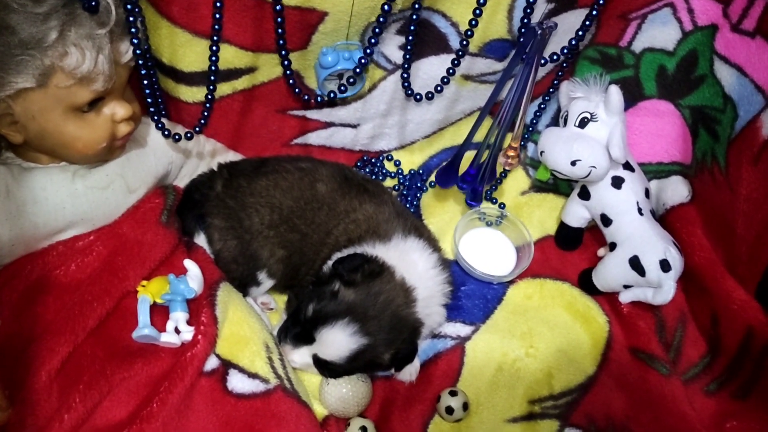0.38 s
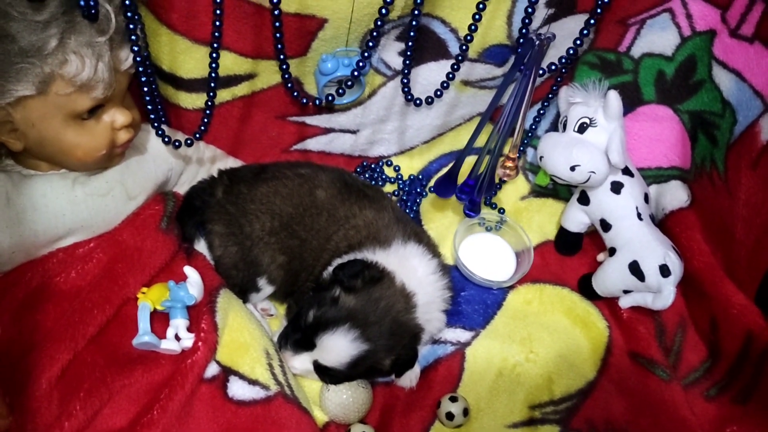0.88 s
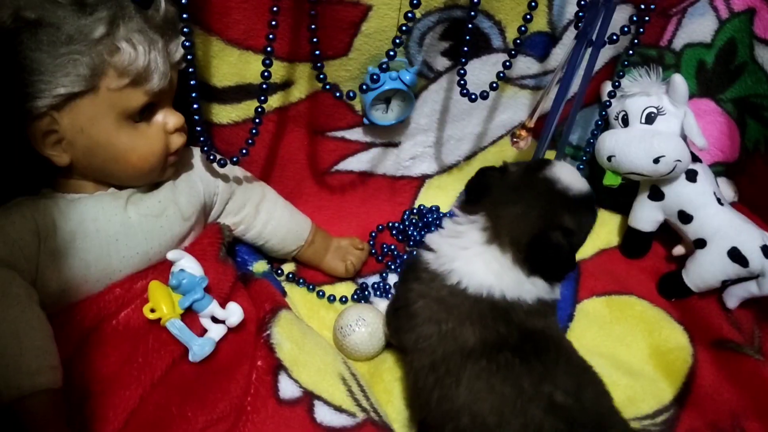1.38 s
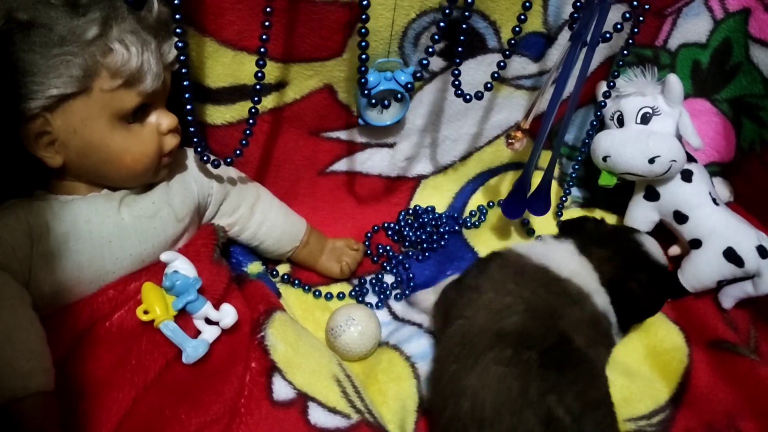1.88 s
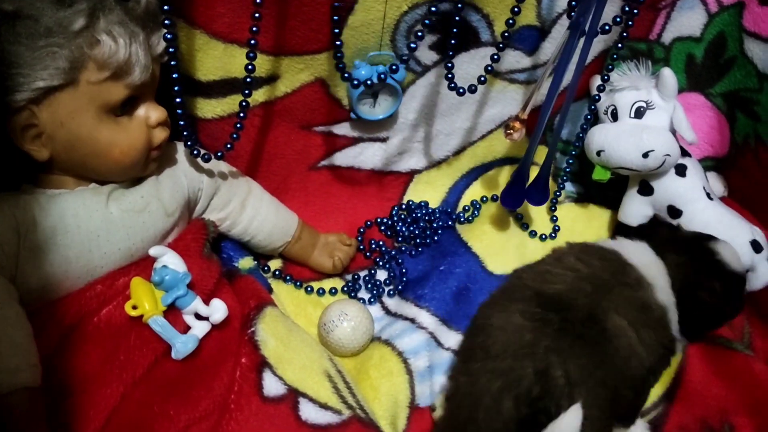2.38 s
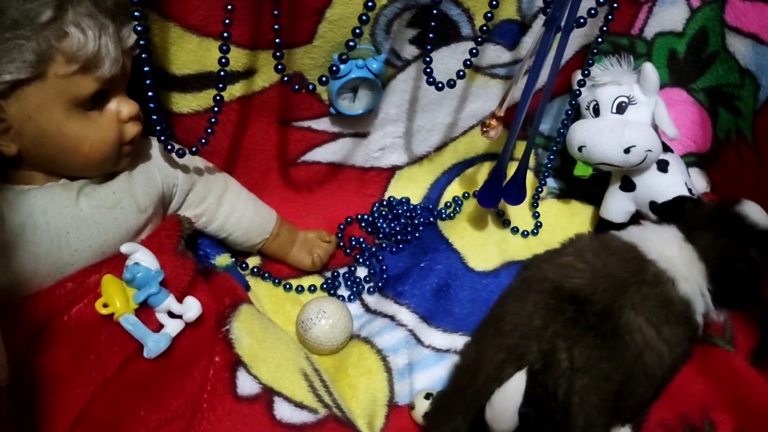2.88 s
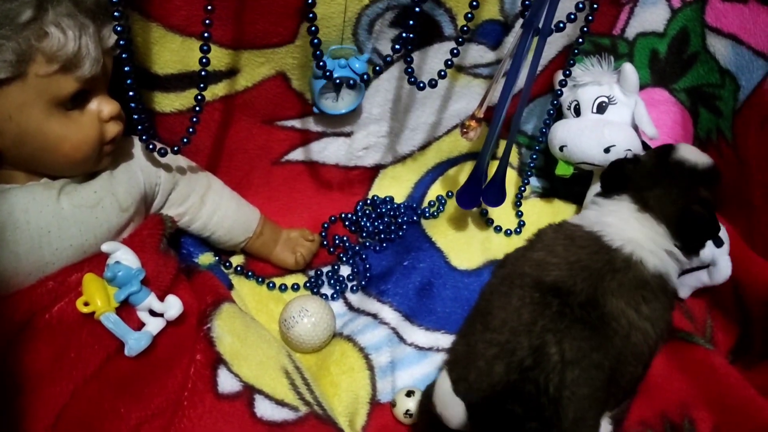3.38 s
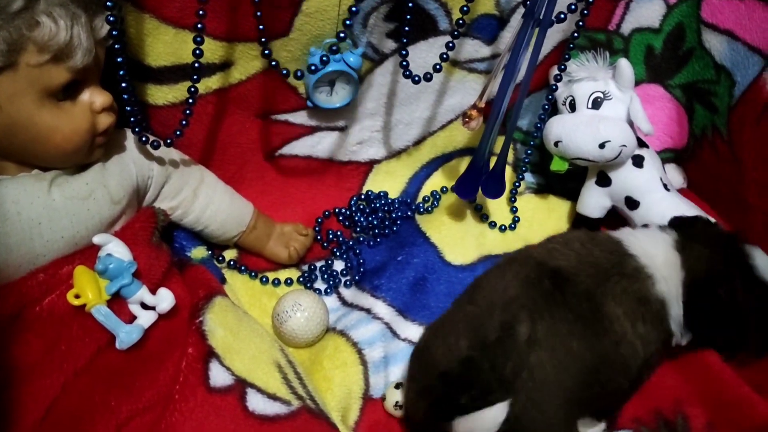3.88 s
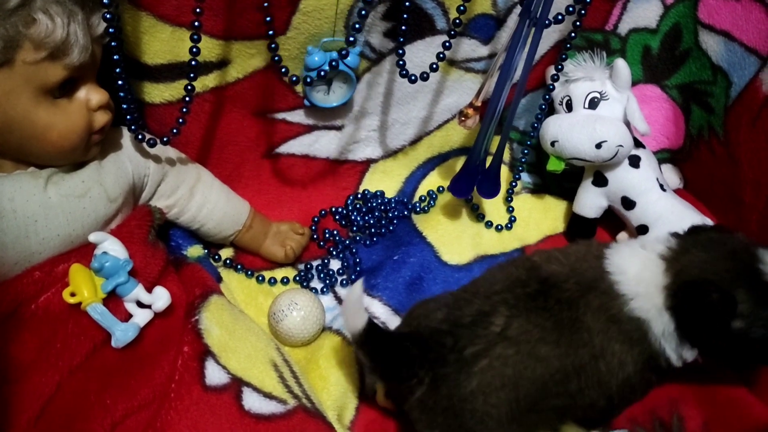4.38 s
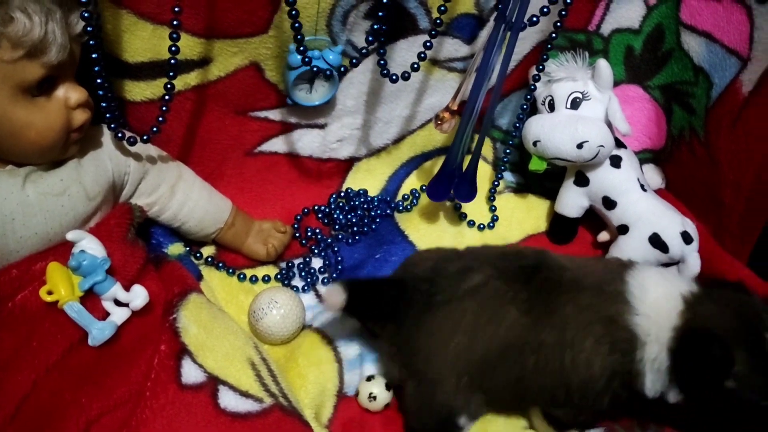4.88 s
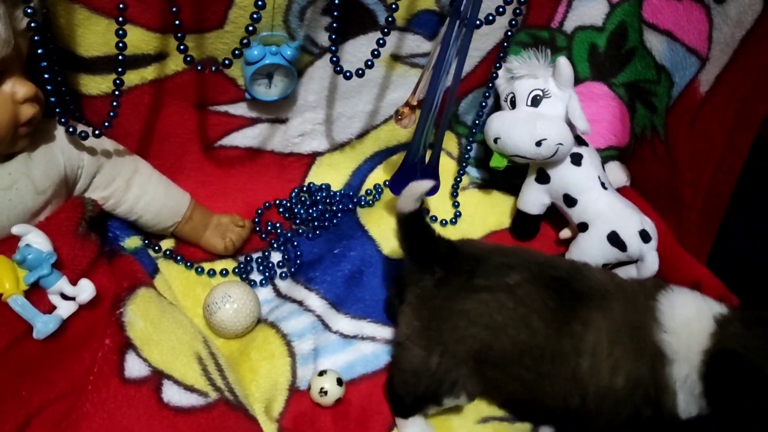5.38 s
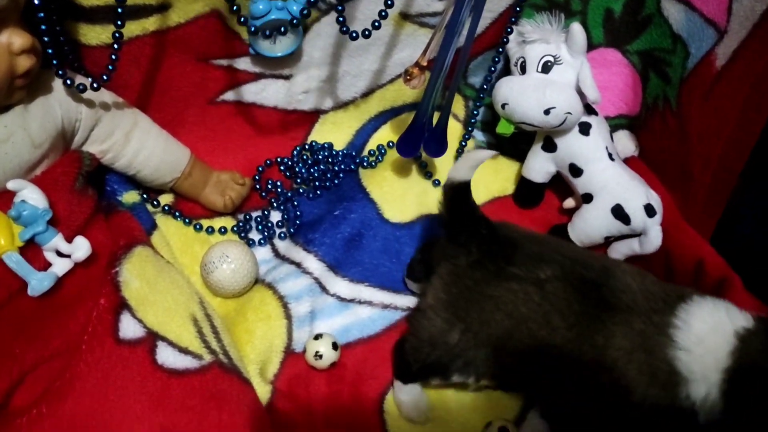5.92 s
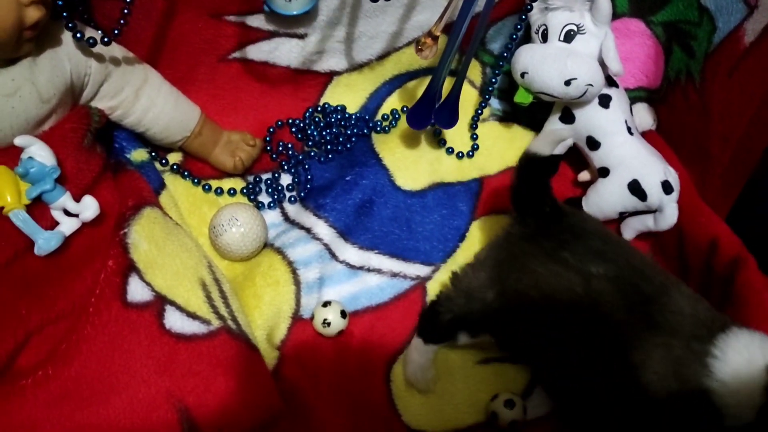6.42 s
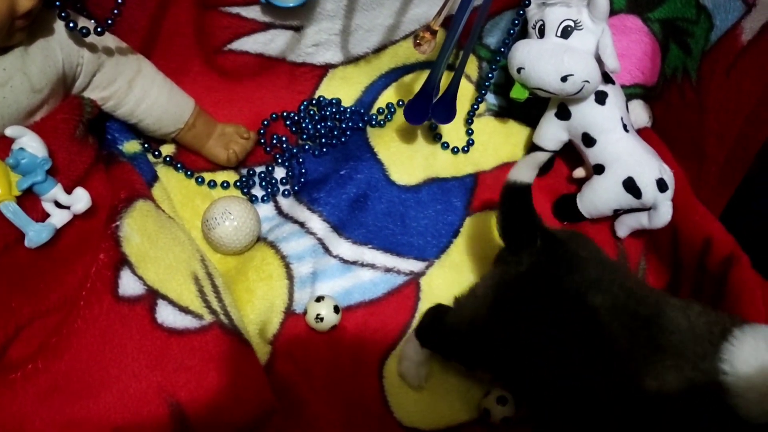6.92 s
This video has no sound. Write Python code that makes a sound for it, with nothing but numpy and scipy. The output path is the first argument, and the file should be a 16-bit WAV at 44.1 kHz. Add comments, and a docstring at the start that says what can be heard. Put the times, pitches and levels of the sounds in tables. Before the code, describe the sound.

A small, furnished room, picked up close in stereo with a constant soft, low-weighted hiss. About one second of near silence, a dull tap at 1.1 and a very brief level dip near 1.2. From 1.36 to 2.3 a puppy gives four short whimpers, thin near-pure whistles arching around 1 to 1.3 kHz and sagging, the third strongest, the last a small chirp. A pause follows, with a soft knock at 2.5. From 3.45 the whines return in quick succession, running into a hoarse, rough yelp at 3.9-4.06. More lower whines follow at 4.2 and 4.5, a short groan at 4.6, then a longer low groan from 4.8 to 5.2, throbbing rapidly with rasp over cloth scuffs. Light handling taps dot this run. At 5.7 a sputtering nasal huff fades by 6. Then hiss, a faint blanket scuff at 6.4 and a fainter one at 6.9.

```python
"""A puppy on a blanket whimpers in short arched cries: near-pure whistles, roughened by shaken pitch and air.
It yelps once hoarsely (chaotic slaps into resonances), groans twice with a throb (a fluttering hum with rasp)
and huffs through its nose (sputtering noise around a faint voiced hum). Cloth scuffs are shaped noise,
handling taps and knocks short low pushes. A small furnished room answers, two spaced microphones hiss,
and the level dips briefly near the start."""
import sys
import numpy as np
from scipy import signal
from scipy.fft import rfft, irfft, next_fast_len
from scipy.io import wavfile

SR = 44100
rng = np.random.default_rng(int(sys.argv[2]) if len(sys.argv) > 2 else 0)


def invert_db(level):
    """Linear amplitude ratio for a level in decibels (20 dB per decade), elementwise."""
    return 10 ** (np.asarray(level, dtype=float) / 20)


def generate_wav(signal):
    """Clip the signal to [-1, 1] and save it as 16-bit WAV at the path in sys.argv[1]."""
    frames = np.transpose(np.atleast_2d(signal))
    scaled = np.clip(frames, -1, 1) * 32767
    pcm = np.round(scaled).astype(np.int16)
    wavfile.write(sys.argv[1], SR, pcm)


N = 310023  # length in samples, about 7 s

# nasal colour of upper harmonics and breath, before tilting: frequency_hz, relative_level_db
NOSE = [(2400, -2.5), (2900, -18.5), (3600, -13.5), (4200, -4.5), (5000, -2), (6300, -3), (7300, -11.5),
        (8600, -4), (10000, -14), (11200, -24), (13000, -11.5), (15500, -19)]


def evened(x):
    """Scales to rms 1."""
    return x / np.sqrt(np.mean(x ** 2) + 1e-20)


def read(points, hz):
    """Reads a table over frequency, interpolating on a log axis."""
    f, value = np.transpose(points)
    return np.interp(np.log(hz + 1), np.log(f + 1), value)


def columns(rows):
    """Turns breakpoints into a time axis and every other column at sample rate."""
    s, *cols = np.transpose(rows)
    t = np.arange(s[0], s[-1], 1 / SR)
    return t, [np.interp(t, s, c) for c in cols]


def turned(colour, tilt_db):
    """Tilts a colour by so many dB per octave above 5500 Hz, the strongest nasal resonance."""
    return [(hz, db + tilt_db * max(np.log2(hz / 5500), 0)) for hz, db in colour]


def add(mix, start_s, sound, pan_db=0., edge_s=0.002):
    """Lays a sound into both channels, fading in over edge_s and out over twice that; positive pan is left."""
    n = np.arange(len(sound))
    soft = np.minimum(1, np.minimum(n, n[::-1] / 2) / (edge_s * SR + 1))
    sides = invert_db(pan_db * np.array([[0.5], [-0.5]]))
    part = mix[:, round(start_s * SR):][:, :len(n)]
    part += (sound * soft * sides)[:, :part.shape[1]]


def noise(points, size, channels=1):
    """Noise of a given spectrum, rms 1."""
    n = next_fast_len(size)
    white = rfft(rng.standard_normal((channels, n)))
    colour = invert_db(read(points, np.fft.rfftfreq(n, 1 / SR)))
    return evened(irfft(white * colour, n)[:, :size])


def wobble(size, hz):
    """Smooth random motion of rms 1, up to about hz."""
    lowpass = signal.butter(2, hz, fs=SR, output="sos")
    return evened(signal.sosfilt(lowpass, rng.standard_normal(size + 2000))[2000:])


def resonate(x, modes):
    """Sums resonances, each passed twice for dark valleys, at rms 1."""
    out = 0
    for hz, width, db in modes:
        pole = np.exp((2j * np.pi * hz - np.pi * width) / SR)
        once = signal.lfilter([1 - abs(pole)], [1, -pole], x)
        twice = signal.lfilter([1 - abs(pole)], [1, -pole], once)
        out = out + invert_db(db) * twice.real
    return evened(out)


def stack(turns, hz, colour, first):
    """Sixteen harmonics from number first upward under a fixed colour, at steady loudness."""
    k = np.arange(first, first + 16)[:, None]
    height = invert_db(read(colour, k * hz)) * (k * hz < SR / 2.5)
    lines = height * np.cos(2 * np.pi * k * turns + k ** 2)
    return lines.sum(0) * np.sqrt(2 / (height ** 2).sum(0))


def cry(mix, rows, pan_db, rough, tilt_db, second_db, upper_db):
    """A near-pure whistle of tight folds; roughness shakes pitch and strength and lets air through."""
    t, (db, hz) = columns(rows)
    u = (t - t[0]) / (t[-1] - t[0])
    # overtones swell in the middle of a cry and sink at its ends
    start, end = np.maximum(1 - 2 * u, 0) ** 2.5, np.maximum(2 * u - 1, 0) ** 2.5
    second_db = second_db + 0.44 * (db - db.max()) - start - 5.5 * end
    # a high second harmonic slides into the nasal valley, 52 dB per octave above 2180 Hz
    second_db = second_db - 52 * np.maximum(np.log2(2 * hz / 2180), 0)
    upper_db = upper_db - 13 * start - 10.5 * end
    rough = np.clip(rough + 0.25 * u ** 5, 0, 1)  # hoarser as the cry runs out
    nose = turned(NOSE, tilt_db)

    shaken_hz = hz * (1 + 0.12 * rough * wobble(len(t), 110) + 0.0071 * wobble(len(t), 40))
    turns = np.cumsum(shaken_hz) / SR
    fundamental = invert_db(db) * np.cos(2 * np.pi * turns)
    second = invert_db(second_db) * np.cos(4 * np.pi * turns)
    # in the high treble the harmonics give way to air
    lines = stack(turns, hz, turned(nose, -8.5), first=3) * (1 + 0.3 * wobble(len(t), 62))
    air = (0.25 + rough) * noise(turned(nose, 6.5), size=len(t))[0]
    sound = np.sqrt(2) * (fundamental + second) + invert_db(upper_db) * (lines + air)
    add(mix, t[0], sound * (1 + 0.83 * rough * wobble(len(t), 120)), pan_db)


def yelp(mix):
    """Folds slap chaotically into the throat; the mouth opens at the peak."""
    # resonances of the throat, then of the mouth: frequency_hz, width_hz, relative_level_db
    throat_modes = [(285, 30, -7.5), (740, 93, 2), (960, 74, 0)]
    mouth_modes = [(1423, 310, 4), (2140, 410, -5), (2780, 540, -10.5), (3890, 67, -10)]
    start_s, snap_s, end_s = 3.908, 4.024, 4.062  # the mouth is widest at the snap
    slap_hz = 306.6  # mean rate of the folds
    shut_db, open_db, opening_s, closing_s = -37.5, -18, 0.04, 0.011
    breath_db, gasp_db, gasp_lead_s, gasp_s = -50.5, -36.5, 0.019, 0.015  # breath bursts just before the snap
    t = np.arange(start_s, end_s, 1 / SR)
    late = t - snap_s

    fall_db = -600 * np.maximum(late, 0)  # held until the snap, then 600 dB per second down
    throat = invert_db(-26 + fall_db) * np.clip(0.4 + (t - t[0]) / 0.01, 0, 1)
    opening = np.exp(-(late / np.where(late < 0, opening_s, closing_s)) ** 4)
    mouth = throat / throat.max() * invert_db(shut_db) + invert_db(open_db) * opening ** 2
    breath = invert_db(breath_db) + invert_db(gasp_db) * np.exp(-((late + gasp_lead_s) / gasp_s) ** 2)

    turns = np.cumsum(slap_hz * (1 + 0.3 * wobble(len(t), 200))) / SR
    slaps = np.diff(np.floor(turns), prepend=0) * (1 + 0.33 * wobble(len(t), 300))
    slaps = slaps * (1 + 0.5 * (-1) ** np.floor(turns))  # strong-weak pairs
    puffs = np.exp(-(turns % 1) / 0.77) * rng.standard_normal(len(t))  # noise fading after each slap
    drive = evened(slaps - slaps.mean()) + 0.65 * evened(puffs)
    voice = throat * resonate(drive, throat_modes) + mouth * resonate(drive, mouth_modes)
    small_head = signal.butter(2, [230, 4300], "band", fs=SR, output="sos")  # sends out little bass
    voice = signal.sosfilt(small_head, voice)
    add(mix, t[0], voice + breath * noise(turned(NOSE, -7), size=len(t))[0], -2.6)


def hum(mix, rows, over_db, onset_db, onset_s, depth_start, depth_end):
    """Slack folds hum low; a flutter lets the tone through in bursts, and the overtones rasp between them."""
    # colour of the overtones: frequency_hz, relative_level_db
    chest = [(70, -30), (220, -2), (400, -10), (640, 8), (1000, -24), (1400, -11.5), (2300, -45),
             (5500, -38), (9000, -68)]
    throb_hz, crest_s = 26.07, 5.044  # rate of the flutter and one of its crests
    t, (db, hz) = columns(rows)
    over_db = over_db + onset_db * np.exp(-(t - t[0]) / onset_s)
    depth = np.clip(np.linspace(depth_start, depth_end, len(t)), 0, 1)
    beat = 2 * np.pi * (t - crest_s) * throb_hz
    shut = depth * (1 - np.cos(beat - 0.73 * np.cos(beat))) / 2  # slow swell, quick stop

    turns = np.cumsum(hz * (1 + 0.07 * depth * wobble(len(t), 110))) / SR
    tone = 2.12 * (1 - shut) * np.cos(2 * np.pi * turns) * (1 + 0.2 * wobble(len(t), 130))
    rasp = evened((1 + np.cos(2 * np.pi * turns)) * noise(chest, size=len(t))[0])
    over = (1 - 0.1 * depth) * stack(turns, hz, chest, first=2) + 0.62 * depth * rasp
    over = over * (0.66 + 0.48 * shut) * (1 + 0.31 * wobble(len(t), 120))
    air = invert_db(-24.5) * noise(turned(NOSE, 1), size=len(t))[0]  # through the nose
    add(mix, t[0], invert_db(db) * (tone + invert_db(over_db) * (over + air)), -2.5)


def huff(mix):
    """Air sputters through the nostrils; the harder the blast, the brighter."""
    # course of the blast before sputtering: time_s, level_db
    blast = [(5.5, -70), (5.55, -61.5), (5.7, -59), (5.712, -43.5), (5.73, -39), (5.77, -50), (5.82, -56.5),
             (5.9, -64.5), (5.98, -71)]
    # colour of air through the nostrils: frequency_hz, relative_level_db
    nostrils = [(410, -2.5), (700, -6), (3360, -2.5), (4700, -6), (8990, -8), (10600, -30), (12100, -14.5),
                (15500, -54.5)]
    t, (db,) = columns(blast)
    bright = np.clip(invert_db(0.42 * (db - db.max())), 0, 1)
    dull_air = noise(turned(nostrils, -33), size=len(t))[0]
    air = bright * noise(nostrils, size=len(t))[0] + (1 - bright) * dull_air
    add(mix, t[0], invert_db(db + 5.6 * wobble(len(t), 490)) * air)


def scuff(mix, peak_s, fading_s, rumble_db, rub_db, hiss_db):
    """Lumpy rumble of a body shifting, with the rub and fine hiss of cloth."""
    t = np.arange(-0.15, 0.5, 1 / SR)
    rise_s = 0.029
    shape_db = -7 * abs(t / np.where(t < 0, rise_s, fading_s)) ** 1.15  # 7 dB down after fading_s
    rumble = noise([(40, -8), (120, -0.5), (220, -7.5), (500, -11), (1500, -21.5), (3000, -70)], size=len(t))[0]
    rub = noise([(900, -19.5), (2000, 5), (4000, -1), (7000, -34.5)], size=len(t))[0]
    hiss = noise([(4500, -9.5), (8500, 8), (10800, -16.5), (12500, -3), (15500, -20.5)], size=len(t))[0]
    # the rub dies faster than the rumble, the hiss slower
    cloth = invert_db(rub_db + 1.4 * shape_db) * rub + invert_db(hiss_db + 0.73 * shape_db) * hiss
    cloth = cloth * invert_db(4.2 * wobble(len(t), 34))
    lumpy = invert_db(rumble_db + shape_db + 1.9 * wobble(len(t), 75)) * rumble
    add(mix, peak_s + t[0], lumpy + cloth, edge_s=0.012)


def thuds():
    """Short low pushes with a faint click, carried through the housing, some mostly to one microphone."""
    # handling taps and knocks: time_s, push_peak_db, ring_hz, length_cycles, left_right_db
    taps = [(1.08, -42, 356, 0.43, 2), (2.4626, -39.5, 254, 1.47, -0.5), (3.506, -43.5, 398, .6, 1),
            (3.7159, -36, 433, 0.16, -19), (3.767, -44.5, 480, 0.44, -22.5), (4.561, -36, 287, 1.23, -2.5),
            (5.4468, -34.5, 227, 0.2, -13.5), (5.565, -42.5, 198, 0.47, -14.5)]
    mix, t = np.zeros((2, N)), np.arange(-0.02, 0.02, 1 / SR)
    for s, db, hz, cycles, pan_db in taps:
        push = np.cos(2 * np.pi * hz * t) * np.exp(-(t * hz / cycles) ** 2)
        click = noise([(300, 4), (1000, -10), (4000, -24), (14000, -25)], size=len(t))[0]
        click = click * np.exp(-((t + 0.00033) / 0.0021) ** 2)
        click_db = -6.5 - 6 * cycles  # softer, longer thuds click less
        add(mix, s + t[0], invert_db(db) * (push + invert_db(click_db) * click), pan_db)
    return mix


def room(x):
    """Sparse taps of random sign, each band dying at its own speed; the bass reaches both microphones alike."""
    # reverberation: frequency_hz, t60_s
    t60 = [(250, 0.45), (1000, .28), (3000, 0.18), (10000, 0.21)]
    # colour of the room sound: frequency_hz, level_db
    wet = [(200, -10), (500, -8), (1200, -8), (2500, -1.5), (4500, -5), (12000, -0.5)]
    # likeness at both microphones, held within 0-1: frequency_hz, likeness
    alike = [(150, 1), (400, 0.3), (900, 0), (2000, 0.4)]
    size = SR // 2
    taps = np.zeros((2, size))
    at = np.arange(120, size - 20, 20) + rng.integers(0, 20, (2, (size - 121) // 20))
    np.put_along_axis(taps, at, rng.choice([-1., 1.], at.shape), 1)
    hz, t, z = signal.stft(taps, SR, nperseg=256)
    same = np.clip(read(alike, hz), 0, 1)[:, None]
    z = np.array([z[0], same * z[0] + np.sqrt(1 - same ** 2) * z[1]])
    decay = invert_db(-60 * t / read(t60, hz)[:, None])
    even = np.sqrt(len(t) / (decay ** 2).sum(1, keepdims=True))  # same energy in every band before colouring
    decay = decay * invert_db(read(wet, hz))[:, None] * even
    tail = signal.istft(z * decay / np.linalg.norm(taps[0]), SR, nperseg=256)[1]
    return signal.fftconvolve(x.mean(0)[None], tail, axes=1)[:, :N]


def microphone_hiss():
    """Unrelated coloured noise in each microphone, both drifting slowly in level together."""
    # colour of the hiss: frequency_hz, relative_level_db
    colour = [(25, -31.5), (50, -14), (80, 0.5), (110, 4), (400, -1), (520, -6.5), (1600, -14.5),
              (2200, -19), (5500, -22.5), (7500, -28), (10800, -30.5), (12000, -27.5), (15700, -28.5)]
    level_db = -61.5 + 1.7 * wobble(N, 4.4)
    return invert_db(level_db) * noise(colour, size=N, channels=2)


def scene():
    """Puppy and blanket, direct and through the room, with thuds and microphone hiss."""
    # one curve a cry: time_s, fundamental_rms_db (before roughness and mix), pitch_hz
    cries = [
        [(1.2, -65, 1000), (1.258, -69, 960)],
        [(1.36, -44, 1081), (1.385, -42.5, 1169), (1.415, -34.5, 1235), (1.445, -37, 1108), (1.472, -37.5, 895)],
        [(1.612, -44, 1039), (1.64, -34, 1234), (1.67, -33, 1345), (1.705, -37.5, 1162), (1.74, -41.5, 1017),
         (1.768, -39.5, 823)],
        [(1.893, -41.5, 982), (1.93, -39.5, 1128), (1.947, -36, 1063), (1.968, -43.5, 1152),
         (1.983, -38.5, 1057), (2.0, -29.5, 898.5), (2.045, -27.5, 844), (2.078, -40.5, 663)],
        [(2.225, -38.5, 855), (2.245, -33.5, 696), (2.272, -48, 674)],
        [(3.458, -45.5, 810), (3.478, -34, 870), (3.51, -40.5, 788), (3.54, -67.5, 810)],
        [(3.652, -45, 1114), (3.69, -36.5, 1167), (3.718, -44, 1202), (3.742, -36.5, 920)],
        [(3.877, -44, 951), (3.892, -31, 865), (3.908, -36.5, 975), (3.925, -36, 1020)],
        [(4.197, -42, 770), (4.225, -34.5, 820), (4.25, -40.5, 842), (4.285, -31.5, 818), (4.332, -44, 685)],
        [(4.467, -45.5, 899), (4.495, -36, 781), (4.52, -43.5, 893.5), (4.55, -33.5, 795), (4.582, -28, 713)],
        [(4.772, -35.5, 807), (4.81, -37.5, 802), (4.86, -32.5, 723), (4.94, -49.5, 758), (5.03, -53, 740)],
    ]
    # one row a cry: left_right_db, roughness 0-1 (before the hoarse end),
    # treble_tilt_db_per_octave (falls as the head turns away),
    # second_harmonic_db and upper_harmonics_db (before the swell and sink)
    cry_manners = [(0, .7, 0, -73, -76), (1, .05, 0, -47, -49), (-2, .05, -2, -47, -47),
                   (0.5, .08, -1, -50, -52), (1, .3, 8, -55, -59), (0, .15, 2, -52, -60),
                   (4.5, .1, 1, -54, -57), (1.5, 0.3, -4.5, -46, -47), (1.5, .1, -6, -38, -52),
                   (2, 0, -4, -46, -54), (1, .28, -13.5, -34, -58)]
    # one curve a hum, two groans, then the voiced tone inside the huff:
    # time_s, fundamental_db (before the throb and mix), pitch_hz
    hums = [
        [(4.556, -54, 439), (4.58, -36.5, 453.3), (4.61, -30, 438.7), (4.64, -41, 405), (4.69, -48, 411)],
        [(4.79, -41, 424), (4.84, -40, 395), (4.88, -29, 335.2), (4.93, -26, 327.2), (5.01, -29, 324.1),
         (5.084, -26.5, 325.6), (5.16, -26.5, 317.6), (5.2, -34.5, 273.3), (5.23, -55, 263)],
        [(5.61, -70, 560), (5.68, -53, 561.6), (5.74, -51, 549), (5.785, -52.5, 552)],
    ]
    # one row a hum: overtones_db against the fundamental, extra_db at the onset, its fading_s,
    # throb depth at the start, at the end (held within 0-1)
    hum_manners = [(-5.5, 30.5, 0.0154, 0.32, 0.77), (-10, 12, 0.03, 0.57, 1.17), (-4, -4, .05, 0.4, 0.5)]
    # soft low scuffs on the blanket: peak_s, fading_s, rumble_db, rub_db, hiss_db (before the mix)
    scuffs = [(4.76, 0.15, -46, -47.5, -63.5), (5.07, 0.041, -36.5, -56, -61),
              (4.88, 0.49, -58.5, -68.5, -66), (6.41, 0.092, -50.5, -64, -76),
              (6.92, 0.068, -60.5, -71.5, -72.5)]
    lead_s = 0.00019  # the left microphone is nearer

    pup = np.zeros((2, N))
    for rows, manner in zip(cries, cry_manners):
        cry(pup, rows, *manner)
    yelp(pup)
    for rows, manner in zip(hums, hum_manners):
        hum(pup, rows, *manner)
    huff(pup)
    for row in scuffs:
        scuff(pup, *row)
    n = np.arange(N)
    direct = np.array([pup[0], np.interp(n - lead_s * SR, n, pup[1])])
    knocks = thuds()
    airborne = invert_db(-6) * knocks  # the part of the thuds that excites the room
    heard = invert_db(-2) * direct + knocks + room(pup + airborne)
    bass_cut = signal.butter(3, 70, "high", fs=SR, output="sos")  # small microphones lose the deep bass
    return signal.sosfilt(bass_cut, heard) + microphone_hiss()


def low_pass(x):
    """Removes everything above the highest recorded frequency."""
    return signal.sosfilt(signal.butter(12, 15810, fs=SR, output="sos"), x)


def record(dry):
    """The level dips briefly, then a steep low-pass limits the band."""
    # the dip: start_s, end_s, level_db
    start_s, end_s, dip_db = (1.16, 1.198, -28)
    corners_s = [start_s - 0.003, start_s + 0.0016, end_s - 0.005, end_s + 0.00056]
    level_db = np.interp(np.arange(N) / SR, corners_s, [0, dip_db, dip_db, 0])
    lowpass = signal.firwin(511, 15800, window=("kaiser", 9), fs=SR)[None]
    mix = signal.oaconvolve(dry * invert_db(level_db), lowpass, "same")
    return low_pass(mix)


dry = scene()
out = record(dry)
generate_wav(out)
```